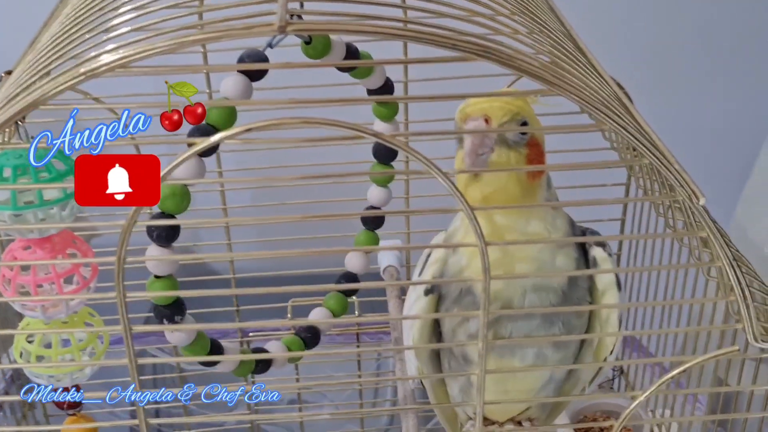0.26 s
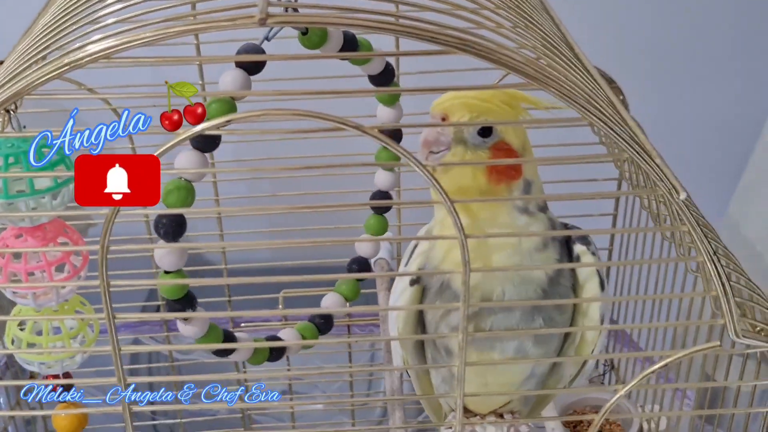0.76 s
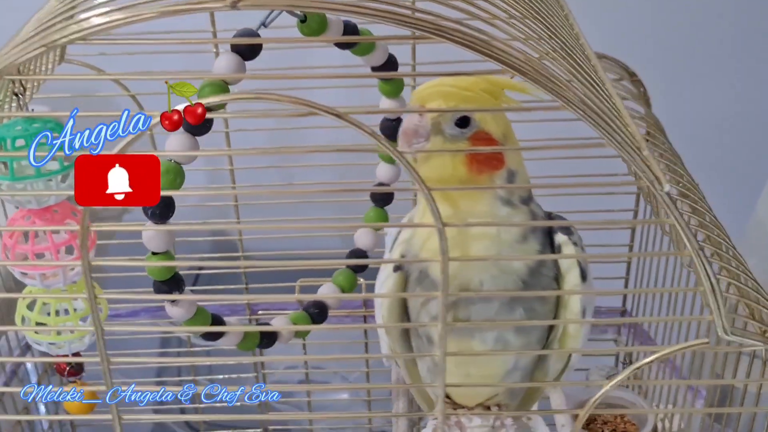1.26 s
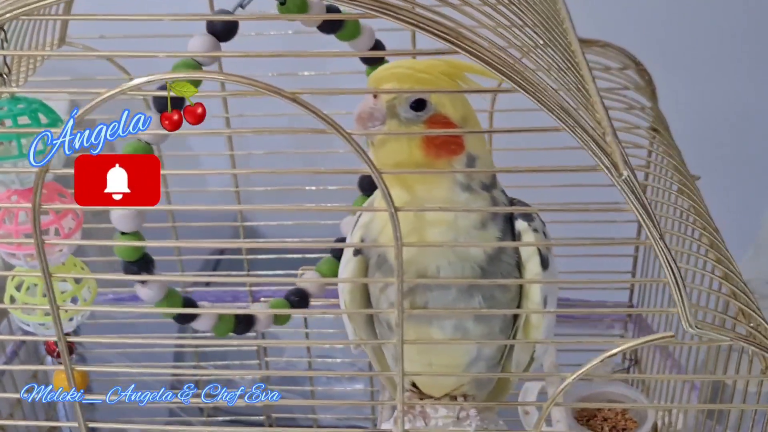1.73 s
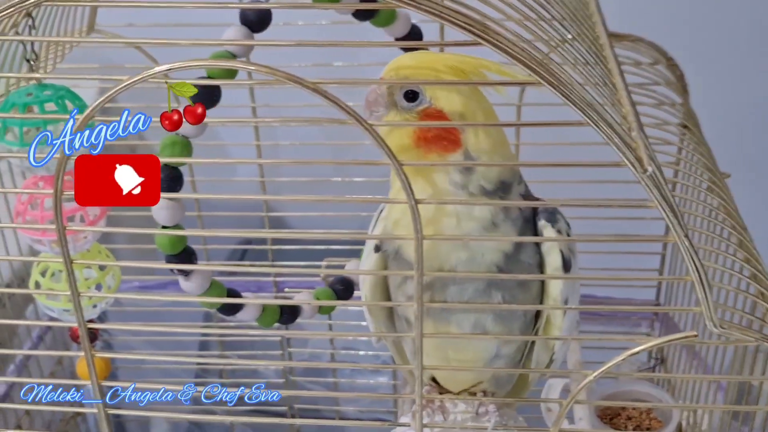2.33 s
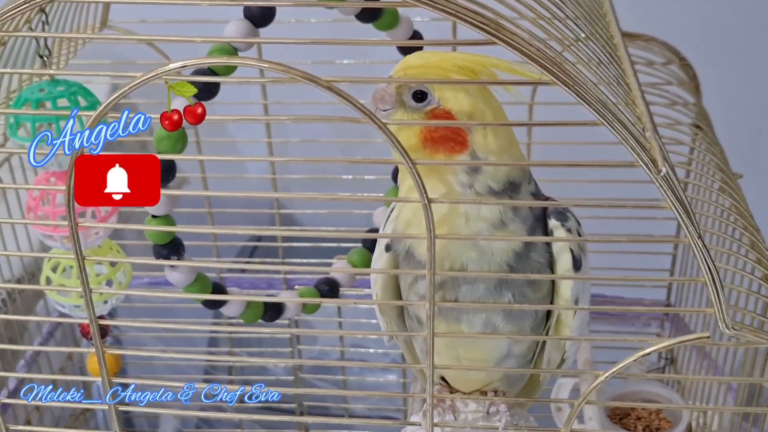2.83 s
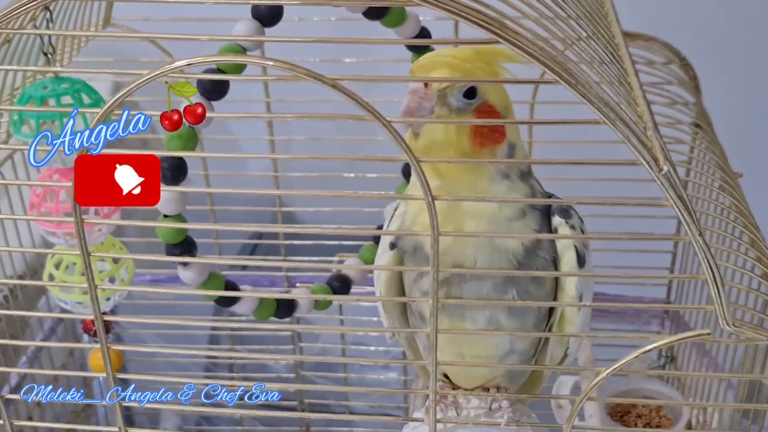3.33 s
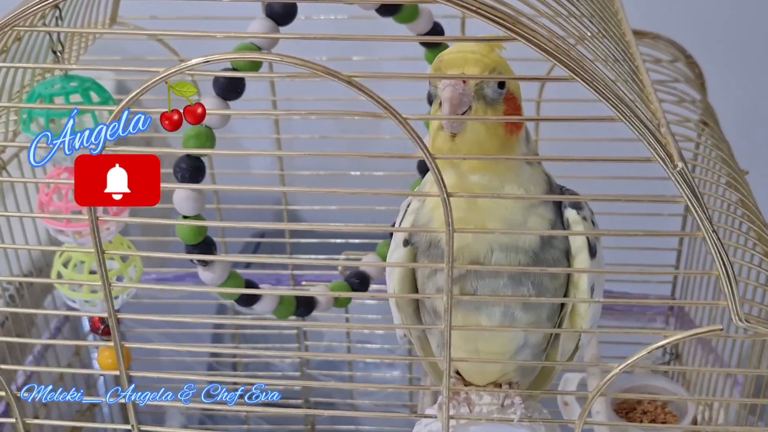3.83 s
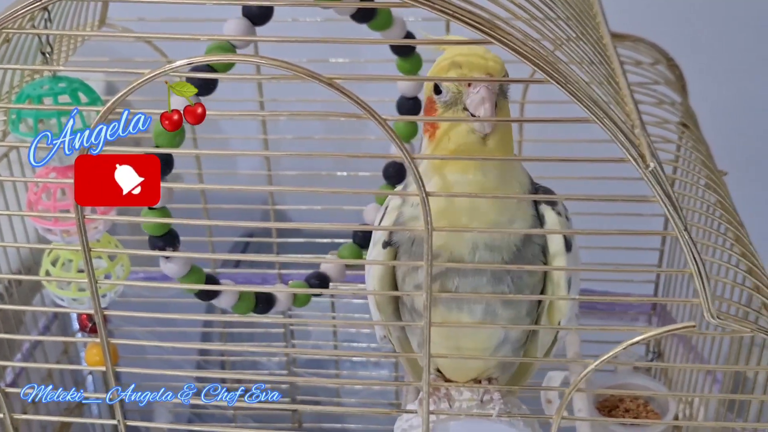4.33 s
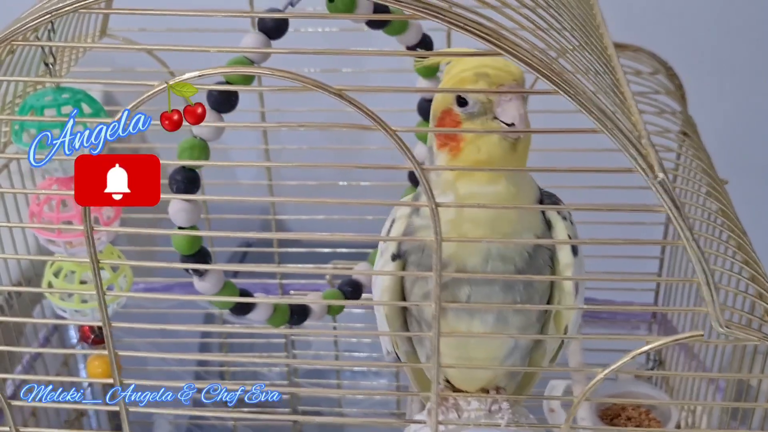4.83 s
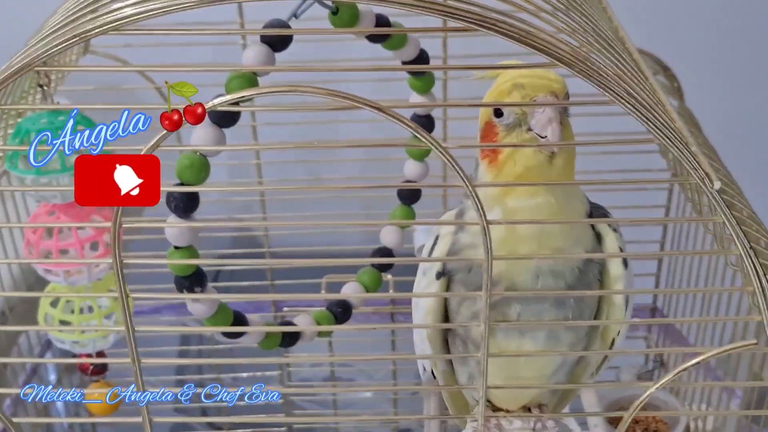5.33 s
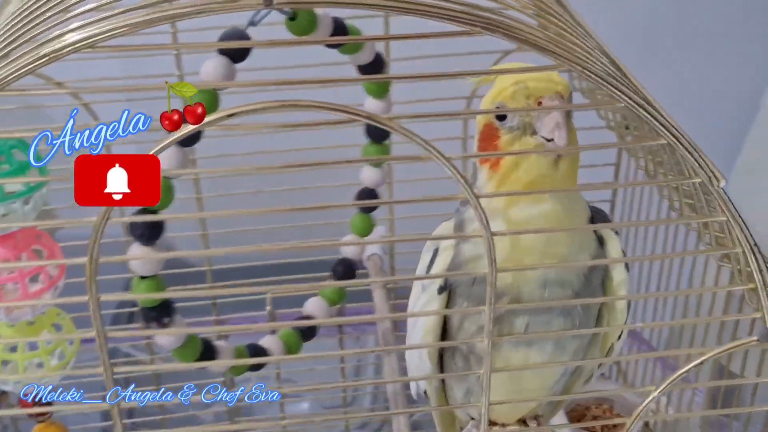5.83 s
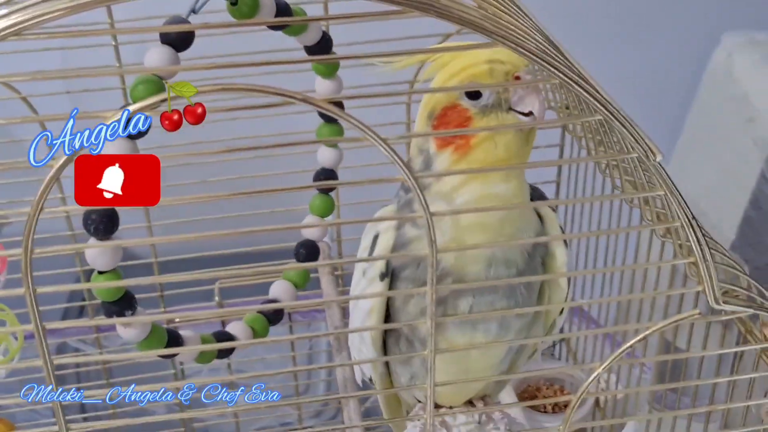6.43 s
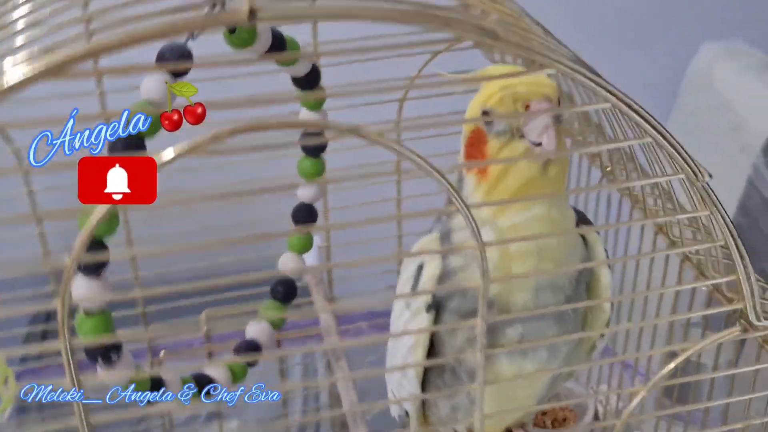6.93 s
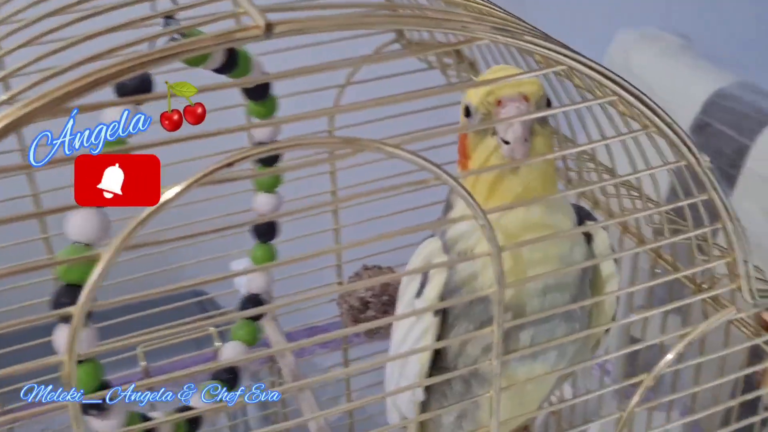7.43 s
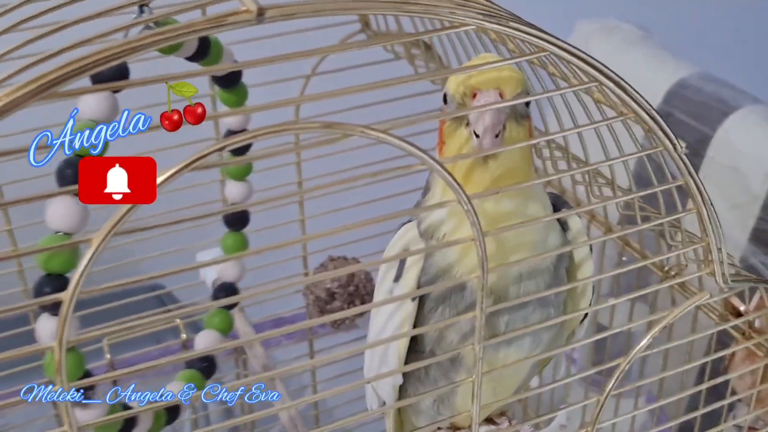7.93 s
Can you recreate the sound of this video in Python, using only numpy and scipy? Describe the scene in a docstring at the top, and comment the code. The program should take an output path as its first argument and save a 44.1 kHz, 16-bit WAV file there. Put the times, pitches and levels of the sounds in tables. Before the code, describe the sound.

Close to a stereo microphone, a caged cockatiel chirps in short rising whistles that begin with a reedy edge and turn clear. The first calls are unevenly spaced: two soft warbles with a rising note and one loud, harsh call between them. Then long and short upward whistles take turns at an even pace. The small room adds a brief echo, with a faint hum, hush and a few tiny rustles behind.

```python
"""A small, hard-walled room: a cockatiel whistles in its wire cage, close to a stereo microphone.
A typical call opens on a reedy held note, breaks and glides up into a pure whistle. After two soft
warbles and one loud call the bird alternates long and short rises. The room smears every glide;
faint rustles, a hum and a hush that swells with the calls lie beneath."""
import sys
import numpy as np
from scipy import signal
from scipy.fft import rfft, irfft, next_fast_len
from scipy.io import wavfile
from scipy.ndimage import uniform_filter1d

SR = 44100
rng = np.random.default_rng(int(sys.argv[2]) if len(sys.argv) > 2 else 0)


def write(x):
    x = np.atleast_2d(x).T
    wavfile.write(sys.argv[1], SR, np.round(np.clip(x, -1, 1) * 32767).astype(np.int16))

N = 361179


def from_db(db):
    """Decibels to gain."""
    return 10 ** (np.asarray(db) / 20)


def rms_one(x):
    """Scale to unit rms."""
    return x / np.sqrt(np.mean(x ** 2) + 1e-20)


def at_hz(points, hz):
    """Read a table on a log-frequency axis."""
    table_hz, value = np.transpose(points)
    return np.interp(np.log(np.maximum(hz, 1)), np.log(table_hz), value)


def at_times(points, t):
    """Read a table on a time axis."""
    return np.interp(t, *np.transpose(points))


def drift(rate_hz, size):
    """Low-passed random wander, spread 1."""
    run_in = SR // 2
    lowpass = signal.butter(2, rate_hz, fs=SR, output="sos")
    return rms_one(signal.sosfilt(lowpass, rng.standard_normal(size + run_in)))[run_in:]


def stereo(mid, side, correlation):
    """Left and right of given correlation, from two unrelated signals."""
    return np.sqrt(1 + correlation) * mid + np.sqrt(1 - correlation) * side * [[1], [-1]]


def noise(colour, correlation=None):
    """Coloured stereo noise, rms 1."""
    size = next_fast_len(N)
    hz = np.fft.rfftfreq(size, 1 / SR)
    mid, side = rfft(rng.standard_normal((2, size))) * from_db(at_hz(colour, hz))
    spectrum = stereo(mid, side, at_hz(correlation, hz) if correlation else 0)
    return rms_one(irfft(spectrum, size)[:, :N])


def add(track, sound, start_s):
    """Mix a sound into a track."""
    i = round(start_s * SR)
    track[..., i:i + sound.shape[-1]] += sound[..., :N - i]


def port_lead_s(left_deg, spacing_m=.14, sound_m_per_s=343):
    """Arrival lead at the left and right microphone ports."""
    return spacing_m * np.sin(np.radians(left_deg)) / sound_m_per_s * np.array([[.5], [-.5]])


def activity(x, half_db=-24, lag_s=.08):
    """Lagging level follower, 0-1."""
    level = np.sqrt(np.abs(uniform_filter1d(x[0] ** 2, size=441)))
    pole = np.exp(-1 / (lag_s * SR))
    return signal.lfilter([1 - pole], [1, -pole], level / (level + from_db(half_db)))


# Hush spectrum: freq_hz, relative_density_db
HUSH_COLOUR = [(15, -39.5), (25, -8), (91, -13), (178, -5.5), (281, -4), (495, -7), (567, -13),
               (703, -10.5), (1270, -17), (1850, -11.5), (2700, -10), (3000, -10), (3340, -12.5),
               (11500, -7.5), (15500, -8)]
# Hush left-right likeness: freq_hz, correlation
HUSH_CORRELATION = [(50, 0.41), (150, 1), (300, 0.76), (550, 0.47), (1200, 0), (4000, 0), (15000, 0)]
# Slow hush contour: time_s, base_level_db
HUSH_LEVEL = [(0, -57.5), (.6, -59.5), (1.2, -57), (1.9, -57.5), (2.6, -60.5), (3.4, -58), (6, -57),
              (8.19, -57.5)]


def hush(swell, split_hz=2000, low_db=3, hiss_db=1, low_swell_db=8.5, hiss_swell_db=4, flutter_db=1):
    """Fluttering low room noise under a fine hiss; both rise with swell (0-1)."""
    base_db = at_times(HUSH_LEVEL, np.arange(N) / SR)
    air = noise(HUSH_COLOUR, HUSH_CORRELATION)
    low = rms_one(signal.sosfilt(signal.butter(1, split_hz, fs=SR, output="sos"), air))
    hiss = rms_one(signal.sosfilt(signal.butter(3, split_hz, "high", fs=SR, output="sos"), air))
    low *= from_db(base_db + low_db + low_swell_db * swell + flutter_db * drift(22, N))
    hiss *= from_db(base_db + hiss_db + hiss_swell_db * swell)
    return low + hiss


def hum(pitch_hz=200, level_db=-66, waver_hz=2, waver_db=3):
    """Faint tone, wavering in pitch and level."""
    phase = 2 * np.pi * np.cumsum(pitch_hz + waver_hz * drift(3.8, N)) / SR
    return np.sqrt(2) * np.sin(phase) * from_db(level_db + waver_db * drift(5.6, N))


# Note shapes, before each call's stretch and tuning. glide: time_s, pitch_hz
LONG_RISE = dict(glide=[(0, 1484), (.028, 1505), (.072, 1455), (.135, 1954), (.16, 2132), (.198, 2572),
             (.239, 3413), (.26, 3829), (.274, 3860)],
             reedy_s=0.0462, opening_db=2, reedy_db=10.5, tilt_db=-0.5, whistle_reedy_db=-46, rough=0.2, sizzle_db=-23.5, trill_share=.02, trill_hz=60, release_s=0.017, release_db=-21.5)
SHORT_RISE = dict(glide=[(0, 1437), (.023, 1441), (.05, 1386), (.079, 1369), (.104, 1630), (.126, 1945),
              (.162, 2070)],
              reedy_s=0.03996, opening_db=-0.5, reedy_db=10.5, tilt_db=0, whistle_reedy_db=-40, rough=.21, sizzle_db=-22.5, trill_share=0.078, trill_hz=59.72, release_s=0.043, release_db=-14.5)
WARBLE = dict(glide=[(0, 1288), (.033, 1173), (.06, 1296), (.092, 1740), (.117, 1980), (.135, 2150),
          (.158, 2900)],
          reedy_s=.022, opening_db=5.5, reedy_db=-11.5, tilt_db=-12, whistle_reedy_db=-40, rough=0.31, sizzle_db=-16, trill_share=0.203, trill_hz=37.14, release_s=0.04, release_db=-24)
SOFT_FALL = dict(glide=[(0, 2120), (.013, 2030), (.027, 1420), (.037, 1230), (.056, 1130)],
             reedy_s=0, opening_db=-1, reedy_db=-40, tilt_db=-12, whistle_reedy_db=-45, rough=0.27, sizzle_db=-18, trill_share=0, trill_hz=38, release_s=.008, release_db=-16.5)
LOUD_CALL = dict(glide=[(0, 1545), (.03, 1581), (.068, 1544), (.095, 1734), (.143, 2394), (.157, 2955),
             (.24, 2950), (.263, 1840), (.298, 1424)],
             reedy_s=0.14, opening_db=-1.5, reedy_db=13.5, tilt_db=.5, whistle_reedy_db=-8, rough=0.56, sizzle_db=-39.5, trill_share=0, trill_hz=60, release_s=0.02, release_db=-5.5)
# Whistle loudness as heard in the room, peak near 3 kHz, dip just below: pitch_hz, fundamental_db
LEVEL_BY_PITCH = [(1150, -34.5), (1400, -32), (1520, -30), (1900, -24.5), (2200, -24.5), (2480, -20),
                  (2680, -24.5), (2880, -12), (3100, -16), (3400, -16.5), (3900, -21.5)]


def gesture(note, t, rough_octaves_per_s=3.67, held_rough=.04, falling_share=.28, falling_db=-7):
    """Control curves of a note: the voice breaks from reed to whistle; gliding unsettles it."""
    scoop_s, scoop_share, scoop_db = .009, .09, -10
    break_s, trill_decay_s, reed_fade_db_per_s = .038, .043, 520
    sizzle_held_db, sizzle_knee_hz, sizzle_db_per_octave = -15.5, 2150, -40.5
    hz = at_times(note["glide"], t)
    speed = uniform_filter1d(np.gradient(np.log2(hz), t), size=600) / rough_octaves_per_s
    unsettled = np.tanh(np.abs(speed)) * np.where(speed > 0, 1, falling_share)
    rough = held_rough + (note["rough"] - held_rough) * unsettled

    since_reed_s = np.maximum(t - note["reedy_s"], 0)
    since_break_s = np.maximum(since_reed_s - break_s, 0)
    trill = note["trill_share"] * np.sin(2 * np.pi * note["trill_hz"] * since_break_s)
    hz *= 1 + trill * np.exp(-since_break_s / trill_decay_s)

    scoop = np.exp(-t / scoop_s)   # notes start flat and soft
    opening = np.maximum(1 - since_reed_s / break_s, 0)
    release = np.maximum(1 - (t[-1] - t) / note["release_s"], 0)
    level_db = at_hz(LEVEL_BY_PITCH, hz) + scoop_db * scoop
    level_db += note["opening_db"] * opening + note["release_db"] * release
    level_db += falling_db * np.tanh(np.minimum(speed, 0)) ** 2

    reed_db = np.maximum(note["reedy_db"] - reed_fade_db_per_s * since_reed_s, note["whistle_reedy_db"])
    sizzle_db = note["sizzle_db"] + sizzle_held_db * (1 - unsettled)
    sizzle_db += sizzle_db_per_octave * np.maximum(np.log2(hz / sizzle_knee_hz), 0)
    return hz * (1 - scoop_share * scoop), level_db, reed_db, sizzle_db, rough


# Beak colour of the reedy overtones and of the sizzle: freq_hz, gain_db
REED_COLOUR = [(2400, -1.5), (3000, 0), (3500, -5), (4400, -17.5), (5800, -20.5), (7200, -46.5),
               (8700, -35.5), (10000, -45), (11700, -26), (13000, -39.5), (14700, -33), (16000, -50)]
SIZZLE_COLOUR = [(2500, -22), (4200, -23.5), (5500, -33), (7500, -13.5), (9000, -12), (11000, 4.5),
                 (12500, -6), (14000, -17), (15500, -21.5)]
# Faint second partial of the whistle: freq_hz, gain_db
SECOND_PARTIAL = [(3000, -33.5), (4500, -26.5), (6000, -34.5), (7500, -30)]


def syrinx(note, stretch, tune, extra_reed_db, treble_db, left_deg):
    """Vibrating membranes heard through the beak: one stereo call, plus sizzle and rasp envelopes."""
    catch_rate_hz, catch_share, catch_db, full_catch_rough = 70, .011, 1.4, .2
    waver_rate_hz, waver_share = 46, .0012
    jitter_rate_hz, jitter_share, shimmer_db, flicker_db = 200, .04, 3, 4.5
    attack_s, beak_rest_hz, beam_from_hz = .0014, 1850, 5560
    t = np.arange(int(note["glide"][-1][0] * stretch * SR)) / SR
    hz, level_db, reed_db, sizzle_db, rough = gesture(note, t / stretch)
    # the beak opens as the note climbs, lifting the sizzle's resonance
    beak_ratio = np.sqrt(np.maximum(hz / beak_rest_hz, 1))

    # glides move in small catches; a rough voice also flutters fast
    catches = np.minimum(rough / full_catch_rough, 1) ** 2 * drift(catch_rate_hz, len(t))
    waver = waver_share * drift(waver_rate_hz, len(t))
    jitter = jitter_share * rough * drift(jitter_rate_hz, len(t))
    hz *= tune * (1 + catch_share * catches) * (1 + waver + jitter)
    level_db += catch_db * catches + shimmer_db * rough * drift(jitter_rate_hz, len(t))
    level = from_db(level_db) * np.minimum(t / attack_s, 1)

    phase = 2 * np.pi * (np.cumsum(hz) / SR + hz * port_lead_s(left_deg))
    voice = np.sin(phase)
    for k in range(2, 13):
        partial_hz = k * hz
        tilt_db = note["tilt_db"] * (k - 2)
        reedy = from_db(reed_db + extra_reed_db + at_hz(REED_COLOUR, partial_hz) + tilt_db)
        whistled = from_db(sizzle_db + at_hz(SIZZLE_COLOUR, partial_hz / beak_ratio))
        if k == 2:
            whistled += from_db(at_hz(SECOND_PARTIAL, partial_hz))
        whistled *= from_db(flicker_db * drift(jitter_rate_hz, len(t)))
        beam = from_db(treble_db * np.clip(np.log2(partial_hz / beam_from_hz), 0, 1))
        voice += beam * np.hypot(reedy, whistled) * (partial_hz < SR / 2) * np.sin(k * phase)
    sizzle = level * from_db(sizzle_db + treble_db)
    rasp = rough ** 3 * from_db(.6 * reed_db)
    return np.sqrt(2) * level * voice, np.array([sizzle, rasp])


# Calls: start_s, note, length_ratio, pitch_ratio, gain_db, extra_reed_db, treble_db, pan_db, left_deg
CALLS = [(0.145, WARBLE, 1.0, 1.0, -3.5, 5, -4.5, 2.5, 4),
         (.342, SOFT_FALL, 0.89, 1.01, 4, -9, 4, 4.8, 3.66),
         (.666, LONG_RISE, 0.97, 0.98, -3.5, -0.5, -1.5, 2.6, 7.7),
         (1.977, LOUD_CALL, 1, 1.003, 1.5, -1, -5.5, 4.5, 12.8),
         (2.816, WARBLE, 0.97, 1.017, -3.5, 2.5, -5, 2, 18.6),
         (3.012, SOFT_FALL, 0.93, 1.0, 3, 0, 1, -1, 15.6),
         (3.323, LONG_RISE, 0.99, 0.982, -1, -2, -2, 1.5, 9.3),
         (3.885, SHORT_RISE, 1.01, 0.985, -0.5, -0.5, 0.5, 3, 7.5),
         (4.364, LONG_RISE, 1, 0.99, -0.5, 0.5, -1.5, -0.5, 5.7),
         (4.931, SHORT_RISE, 1.063, 0.99, 0, 1, 0.5, 0.5, 3),
         (5.431, LONG_RISE, 1.0, 0.99, 0.5, 1, 1.5, -2, 3.4),
         (6.008, SHORT_RISE, 1.015, 0.99, 1, 0.5, 1.5, -0.5, 3.5),
         (6.463, LONG_RISE, 1.029, 1, 0, 0.5, 0, -1, 2.8),
         (7.056, SHORT_RISE, 1.016, 1.006, 1.5, 2, 1, -0.2, 3.4),
         (7.506, LONG_RISE, 1.021, 0.99, 0.5, 1, 0, -0.8, 7.2),
         (8.07, SHORT_RISE, 1.055, 0.99, 1, 1, 3, 0, 5.1)]
# Rasp of a rough voice: freq_hz, relative_density_db
RASP_COLOUR = [(900, -37.5), (1800, -8), (3600, -1), (5000, 3.5), (6200, -2.5), (7300, -9), (8800, -5.5),
               (11500, -18.5), (14000, -27), (15500, -29.5)]


def cockatiel(sizzle_gain_db=-10, rasp_gain_db=-27):
    """All calls, each from where the bird sits, with their air noise."""
    voice, air = np.zeros((2, N)), np.zeros((2, N))
    for start_s, note, stretch, tune, gain_db, extra_reed_db, treble_db, pan_db, left_deg in CALLS:
        call, envelopes = syrinx(note, stretch, tune, extra_reed_db, treble_db, left_deg)
        add(voice, call * from_db(gain_db + pan_db * np.array([[.5], [-.5]])), start_s)
        add(air, envelopes * from_db(gain_db), start_s)
    sizzle = from_db(sizzle_gain_db) * air[0] * noise(SIZZLE_COLOUR)
    rasp = from_db(rasp_gain_db) * air[1] * noise(RASP_COLOUR)
    return voice + sizzle + rasp


# Reflections off tray, walls and ceiling: delay_s, gain_db, left_deg
REFLECTIONS = [(.0031, -25.5, -17), (.0068, -14.5, 12), (0.0092, -9.5, -19), (0.0173, -20.5, 18),
               (0.0251, -15, -16)]


def first_echoes(x):
    """Hard reflections; they beat against each glide and break it into beads."""
    size = next_fast_len(N + SR // 10)
    hz = np.fft.rfftfreq(size, 1 / SR)
    paths = sum(from_db(gain_db) * np.exp(-2j * np.pi * hz * (delay_s - port_lead_s(left_deg)))
                for delay_s, gain_db, left_deg in REFLECTIONS)
    return irfft(rfft(x[0], size) * paths, size)[:, :N]


# Tail decay: freq_hz, t60_s
REVERB_T60 = [(500, 0.65), (1500, 0.42), (3000, 0.34), (6000, 0.38), (14000, 0.47)]
# Reverb colour: freq_hz, gain_db
REVERB_GAIN = [(700, 1.5), (1700, 0), (3000, 1), (6000, -2), (11000, 5)]
# Reverb left-right likeness: freq_hz, correlation
REVERB_CORRELATION = [(700, .45), (1500, .6), (3000, .8), (6000, .3), (14000, 0)]


def reverb(x, build_up_s=.008, early_db=-4, early_t60_s=.1):
    """Diffuse room sound: build-up, quick early decay, then a tail longest in the low bands."""
    t = np.arange(int(.7 * SR)) / SR
    mid, side = rng.standard_normal((2, len(t))) * np.minimum(t / build_up_s, 1)
    early = from_db(early_db) * rms_one(from_db(-60 * t / early_t60_s))
    edges_hz = np.geomspace(500, 18000, 9)
    response = 0
    for low_hz, high_hz in zip(edges_hz, edges_hz[1:]):
        hz = np.sqrt(low_hz * high_hz)
        tail = rms_one(from_db(-60 * t / at_hz(REVERB_T60, hz)))
        decay = from_db(at_hz(REVERB_GAIN, hz)) * np.hypot(tail, early)
        band = signal.butter(2, [low_hz, high_hz], "band", fs=SR, output="sos")
        response += decay * signal.sosfilt(band, stereo(mid, side, at_hz(REVERB_CORRELATION, hz)))
    return signal.fftconvolve(x[:1], response / np.sqrt(2 * len(t)), axes=1)[:, :N]


# Soft rustles: start_s, length_s, level_db
RUSTLES = [(1.226, 0.043, -56), (1.295, .03, -52), (1.404, .05, -59.5), (4.074, 0.06347, -49.5),
           (6.319, 0.044, -64), (7.843, 0.042, -46)]
# Rustle spectrum: freq_hz, relative_density_db
RUSTLE_COLOUR = [(1000, -19.5), (3000, -2), (6000, -4), (9000, -4.5), (13000, -4), (16000, -16.5)]


def rustles(grain_db=3, grain_rate_hz=200):
    """Short grainy brushes that swell fast and fade."""
    envelope = np.zeros(N)
    for start_s, length_s, level_db in RUSTLES:
        age = np.arange(SR // 3) / SR / (length_s / 4)
        add(envelope, from_db(level_db) * age * np.exp(1 - age), start_s)
    return envelope * from_db(grain_db * drift(grain_rate_hz, N)) * noise(RUSTLE_COLOUR)


def scene():
    """Bird and rustles in the room, over hush and hum."""
    direct = cockatiel() + rustles()
    return direct + first_echoes(direct) + reverb(direct) + hush(activity(direct)) + hum()


def record(dry):
    """Microphone: deepest bass shed, top cut steeply."""
    low_cut_hz, high_cut_hz = 26, 15700
    dry = signal.sosfilt(signal.butter(3, low_cut_hz, "high", fs=SR, output="sos"), dry)
    return signal.sosfilt(signal.ellip(10, .1, 80, high_cut_hz, fs=SR, output="sos"), dry)


dry = scene()
out = record(dry)
write(out)
```